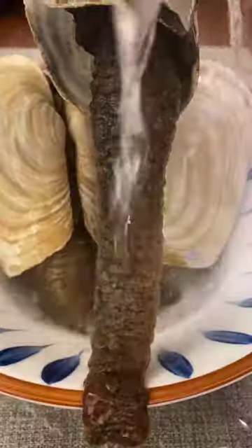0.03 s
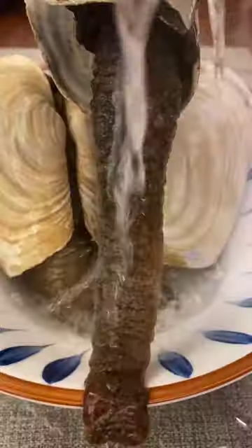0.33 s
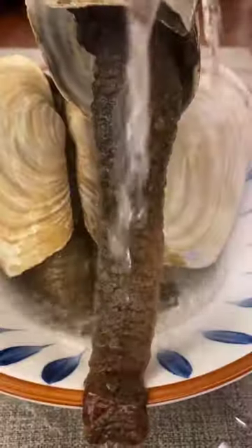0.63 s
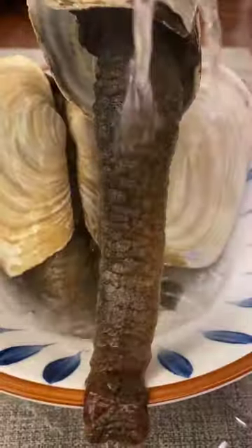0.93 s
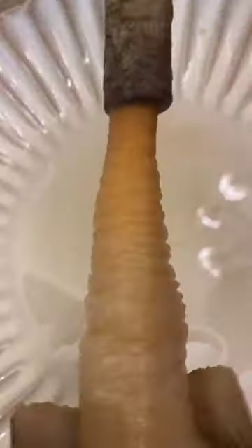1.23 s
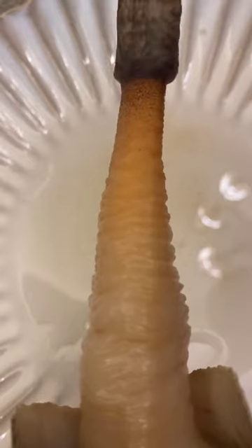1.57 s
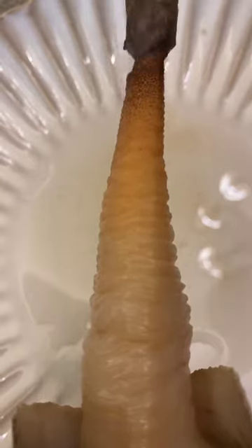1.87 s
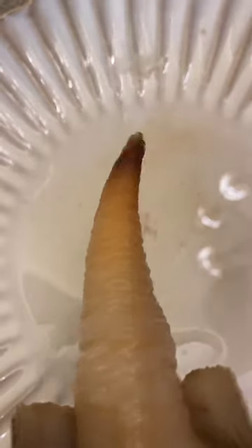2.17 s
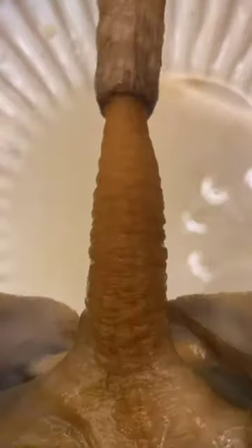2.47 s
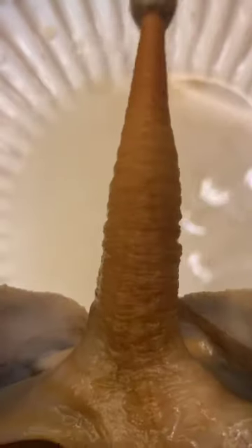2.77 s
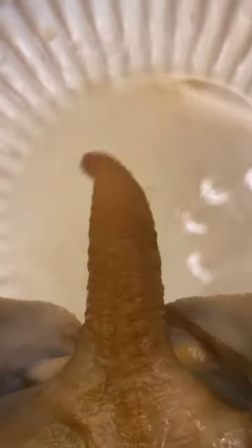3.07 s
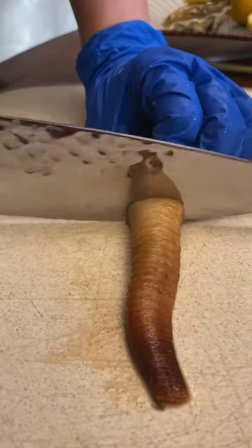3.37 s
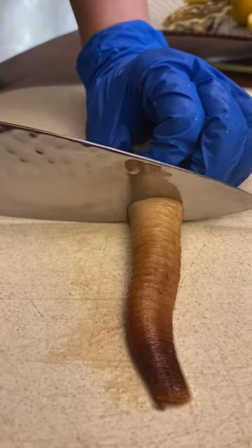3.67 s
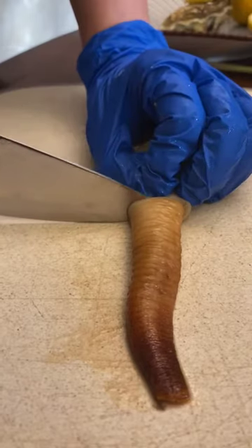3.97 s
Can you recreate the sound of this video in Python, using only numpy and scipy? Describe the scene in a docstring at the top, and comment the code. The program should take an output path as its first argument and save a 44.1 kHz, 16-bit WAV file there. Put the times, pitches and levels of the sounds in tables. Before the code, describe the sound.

Close up in a kitchen with a low appliance hum, water splashes and bubbles over shellfish. After a quieter stretch of faint wet peeling, a knife cuts the flesh, hits the board once and drags along it.

```python
"""Rinsing, skinning and cutting a clam

Close kitchen scenes, joined by short fades, over a low appliance hum. A stream of water splatters on
a long-necked clam and gurgles into its plate; the wet skin is pulled off the neck with faint squelches;
then a knife crunches through the flesh, knocks on the cutting board and is drawn along it."""
import sys
import numpy as np
from scipy import signal
from scipy.fft import rfft, irfft
from scipy.io import wavfile

SR = 44100
rng = np.random.default_rng(int(sys.argv[2]) if len(sys.argv) > 2 else 0)


def int16_out(signal):
    """Quantize to a 16-bit WAV file."""
    q = np.round(np.clip(np.atleast_2d(signal).T, -1, 1) * 32767)
    wavfile.write(sys.argv[1], SR, q.astype(np.int16))


N = 176400
TIME = np.arange(N) / SR
FREQS = np.maximum(np.fft.rfftfreq(N, 1 / SR), 1)

# room tone of each scene: start_s, hum_db, rumble_db, air_db, air_tilt_db_per_octave
ROOM_TONES = [(0, -53.5, -55.5, -53.5, 1), (0.098, -46, -46, -57.5, 5.5), (1.079, -46, -51.5, -55.5, 0.5),
              (2.385, -47, -51, -60, 0.73), (3.322, -52, -49, -56.5, 0)]
# EQ curves of room tone, running water and background hiss: frequency_hz, gain_db
RUMBLE_EQ = [(20, -30.5), (38, -16.5), (62, -0.5), (80, -0.5), (110, -5), (160, -9), (235, -10.5),
             (300, -17.5), (500, -29.5)]
AIR_EQ = [(100, -2.5), (250, 0), (600, -0.5), (1100, -7.5), (1600, -13), (2500, -20), (4000, -32),
          (8000, -42), (15000, -52.5)]
GURGLE_EQ = [(45, -3.5), (100, 25), (150, -6), (230, -1), (350, -6.5), (600, -3), (1000, -5), (1500, -12.5),
             (2400, -18), (3500, -31), (6000, -42)]
DRUM_EQ = [(38, -27), (65, 0), (110, 2.5), (190, -2), (260, -13.5), (500, -50)]
SPRAY_EQ = [(2000, 2), (3500, -9.5), (4700, -21.5), (5600, -2.5), (7000, -4.5), (9000, -2), (10500, -3),
            (12000, 2.5), (14000, -2.5), (16000, 3)]
HISS_EQ = [(700, 13), (2000, -3), (6000, -2.5)]
# stereo images, 1 is mono: frequency_hz, coherence
AIR_IMAGE = [(130, 1), (290, -0.23), (640, -0.63), (3100, -0.2), (15000, 0.47)]
WATER_IMAGE = [(290, 1), (640, 0.44), (1410, 1), (3100, 0.24), (15000, 0.26)]
KNIFE_IMAGE = [(290, 1), (1200, -0.079), (2500, 0.48), (6000, -0.19), (12000, 0.27)]
# envelopes of water in the plate, on the flesh and as spray: time_s, level_db
GURGLE_ENV = [(.1, -50.5), (.8, -49.5), (1.08, -50.5)]
DRUM_ENV = [(.1, -55), (.48, -64), (.54, -38), (.68, -44), (.86, -50), (1.08, -51)]
SPRAY_ENV = [(.1, -59), (.16, -65), (.177, -47), (.2, -55.5), (.3, -54.5), (.38, -65), (.42, -51),
             (.448, -62), (.477, -43), (.54, -64), (.58, -49.5), (.63, -72), (.75, -55), (.8, -51.5),
             (.9, -50), (.935, -72), (.97, -51.5), (1.06, -81)]
# drops slapping the shell: start_s, level_db, pitch_hz, brightness_db
SHELL_DROPS = [(0.1218, -35, 7000, 4.5), (0.1497, -27.5, 7700, -5.5), (0.1696, -52, 9300, 7),
               (0.2162, -39, 9100, 8), (0.2233, -35, 7040, -9), (0.2664, -37.5, 6800, 4.5),
               (.3270, -43, 7250, 9), (.3408, -35.5, 6700, -9), (0.4014, -53, 9200, 9),
               (0.4316, -31, 6750, -4.5), (0.4583, -37, 9200, -15), (0.4653, -33, 8310, -5),
               (.5013, -35, 6700, -12), (0.521, -35, 8600, -6), (0.5251, -31, 7700, -15),
               (0.5557, -39, 7850, 5), (0.5774, -34, 8300, 2), (0.6146, -31, 5240, -4.5),
               (.6480, -41, 6100, -7), (.6560, -34, 6900, -9.5), (.7082, -29, 7030, -11),
               (0.7644, -41.5, 6100, 9.5), (0.776, -41, 6550, 8), (0.7794, -43, 7500, 4),
               (0.7926, -36, 5670, 1), (0.7991, -28.5, 6700, -1), (0.8166, -29, 8400, 0),
               (0.86, -36, 6640, 3), (0.8782, -34.5, 6930, -13), (0.953, -31.5, 8000, -8),
               (.9793, -38.5, 9040, -14)]
# trapped bubbles plinking: start_s, level_db, pitch_hz, t60_s
BUBBLE_PLINKS = [(0.6148, -29, 3580, 0.018), (.7113, -45.5, 4250, 0.015), (0.7344, -42, 3900, 0.017),
                 (0.7387, -34.5, 5420, 0.015), (0.745, -29.5, 5550, 0.015), (0.9687, -42, 3540, 0.014)]
# wet skin squelching: peak_s, half_length_s, level_db, pitch_hz, width_hz
SKIN_SQUELCHES = [(2.255, 0.0045, -63, 5150, 450), (2.262, 0.019, -67, 3240, 450),
                  (2.269, 0.042, -74, 3880, 2000), (2.435, 0.021, -70.5, 2090, 2520),
                  (2.79, 0.078, -81.5, 4200, 1500), (2.877, 0.11, -71.5, 2300, 900),
                  (2.911, 0.005, -56.5, 2350, 1190), (2.943, 0.013, -56.5, 2460, 646),
                  (2.96, .003, -73, 6000, 900), (2.936, 0.049, -68.5, 3200, 1700),
                  (3.089, 0.013, -62, 1309, 400), (3.08, 0.041, -74.5, 2620, 1970)]
# resonances of knife and board: pitch_hz, half_width_hz, cut_db, draw_db
BOARD_MODES = [(247, 27, 0, -22), (291, 55, -2, -4), (456, 26, -5, -2), (592, 47, -7.5, 3.5),
               (784, 35, -7, 2), (1060, 65, -6.5, -3.5), (1250, 48, -9.5, 0), (2008, 148, -15.5, -5.5),
               (2194, 190, -22, -8), (2995, 96, -17, -11.5), (6130, 440, -27.5, -30),
               (6970, 730, -34.5, -28), (12300, 1900, -44.5, -29.5)]
# envelopes of the cut, the draw and the edge hissing on the board: time_s, level_db
CUT_ENV = [(3.33, -58), (3.38, -49), (3.47, -40), (3.505, -33), (3.53, -48.5), (3.57, -50.5), (3.61, -60),
           (3.68, -49.5)]
DRAW_ENV = [(3.5, -51), (3.62, -60.5), (3.68, -53.5), (3.81, -47), (3.95, -51), (4.0, -52)]
EDGE_ENV = [(3.63, -84), (3.66, -67.5), (3.748, -70), (3.76, -56.5), (3.83, -68), (3.95, -82)]
# blade and board thumping; fibres snapping, and the crack of the blade as it lands (near 3.502 s, 2470 Hz):
# start_s, level_db, pitch_hz, t60_s
BOARD_KNOCKS = [(3.503, -25, 315, 0.008), (3.5065, -14, 280, .02), (3.511, -31.5, 71.3, 0.25),
                (3.514, -34, 249.6, 0.3)]
SNAPS_AND_CRACKS = [(3.3892, -52, 6960, .006), (3.4741, -47, 7000, 0.0038), (3.502, -53.5, 12500, .02),
                    (3.5024, -39.5, 2470, 0.016), (3.512, -44, 6300, 0.011), (3.8536, -46.5, 6900, 0.0044)]
# panning of the chop: frequency_hz, left_over_right_db
CHOP_PAN = [(130, 0), (280, -2), (1200, -2.5), (3000, -0.5)]
# early reflections off nearby walls: delay_s, gain_db
WALL_ECHOES = [(.0057, -20.5), (.0093, -13)]

HUM_HZ, OVERTONE_DB, HUM_WAVER_DB = 101.06, -21, 1.4
CLUMPS_PER_S = 68  # how fast bubbles and friction come and go
DROP_RING_DB, DROP_ATTACK_S, DROP_T60_S = 5, 0.00017, 0.0029
SPLASH_DB, SPLASH_T60_S, SPLASH_HZ, SPLASH_SCATTER = 1.5, 0.0054, 12500, 0.089
REBOUND_S, REBOUND_DB = 0.0012, -3.5
PLATE_ECHO_S, PLATE_ECHO_DB = (.0007, 0.001208), -6  # left and right bounce off the plate
BURBLES_PER_S, BURBLE_DB, BURBLE_RANGE_HZ, BURBLE_CYCLES = 75, -52, (698, 5370), 48
BUBBLE_RISE = 0.92  # upward bend of plinks and burbles
CLICK_S, CLICK_DB, CLICK_T60_S = 1.387, -38.5, 0.0049
PULL_S, PULL_HALF_S, PULL_DB = 2.865, 0.13, -44
ROOM_T60_S, ROOM_LOW_CUT_HZ, WATER_ROOM_DB, SKIN_ROOM_DB, KNIFE_ROOM_DB = 0.17, 470, -8.5, 0, 1
FADE_S, FADE_POWER, FADE_FLOOR_DB = 0.051, 2.43, -47
HISS_DB, HIGH_CUT_HZ = -79, 15900


def from_db(db):
    """Decibels to gain."""
    return 10 ** (np.asarray(db) / 20)


def rms_one(x):
    """Scale to unit power."""
    return x / np.sqrt(np.mean(x ** 2) + 1e-20)


def envelope(rows):
    """Gain along a time_s, level_db curve, silent outside it."""
    s, db = np.transpose(rows)
    return from_db(np.interp(TIME, s, db)) * (TIME >= s[0]) * (TIME <= s[-1])


def flicker(depth_db):
    """A gain that wanders at random."""
    knots = np.arange(0, N / SR + 1, 1 / CLUMPS_PER_S)
    return from_db(depth_db * np.interp(TIME, knots, rng.standard_normal(N)[:len(knots)]))


def at_hz(points):
    """Read a curve at every frequency."""
    hz, value = np.transpose(points)
    return np.interp(np.log(FREQS), np.log(hz), value)


def colour(x, eq):
    """Apply an EQ curve, then scale to unit power."""
    return rms_one(irfft(rfft(x) * from_db(at_hz(eq)), N))


def low_cut(x, hz):
    """Roll off below a frequency."""
    return signal.sosfilt(signal.butter(2, hz, "high", fs=SR, output="sos"), x)


def low_noise(eq):
    """Bass noise with no treble."""
    return colour(rng.standard_normal(N), eq + [(4000, -120)])


def spread(pair, image):
    """Use two unrelated signals as mid and side of a stereo image."""
    coherence = np.clip(at_hz(image), -.999, .999)
    mid, side = rfft(pair) * np.sqrt([1 + coherence, 1 - coherence])
    return irfft(np.array([mid + side, mid - side]), N)


def grains(per_s, size_db):
    """Two unrelated trains of random clicks of uneven size."""
    sizes = from_db(size_db * np.minimum(rng.exponential(1, (2, N)), 4))
    return sizes * rng.choice([-1, 1], (2, N)) * (rng.random((2, N)) < per_s / SR) + 1e-18


def resonate(x, hz, width_hz):
    """A resonance with unity gain at its peak."""
    r = np.exp(-np.pi * width_hz / SR)
    feedback = [1, -2 * r * np.cos(2 * np.pi * hz / SR), r * r]
    return signal.lfilter(np.array([1, 0, -1]) * (1 - r * r) / 2, feedback, x)


def resonate_twice(x, hz, width_hz):
    """Two resonances in series, for steeper skirts."""
    return resonate(resonate(x, hz, width_hz), hz, width_hz)


def dying(t60):
    """Time and a decay that falls 60 dB in t60 seconds."""
    t = np.arange(SR // 3) / SR
    return t, np.exp(-np.log(1000) * t / t60)


def ping(hz, t60, rise=0):
    """A dying sine whose pitch may rise."""
    t, decay = dying(t60)
    return decay * np.sin(2 * np.pi * hz * t * (1 + rise * t))


def burst(hz, width_hz, t60):
    """A dying puff of noise around a pitch."""
    t, decay = dying(t60)
    return decay * rms_one(resonate(rng.standard_normal(len(t)), hz, width_hz))


def add(track, s, sound):
    """Mix a sound in at a time."""
    i = int(s * SR)
    track[i:i + len(sound)] += sound[:N - i]


def in_room(x, wet_db):
    """Dry sound plus a diffuse stereo tail with little bass."""
    t, decay = dying(ROOM_T60_S)
    tail = low_cut(rng.standard_normal((2, len(t))) * decay, ROOM_LOW_CUT_HZ)
    tail /= np.sqrt(np.sum(decay ** 2))
    return x + from_db(wet_db) * signal.fftconvolve(x[None], tail, axes=1)[:, :N]


def reflected(x):
    """Add early reflections off nearby walls, which return little bass."""
    bright = low_cut(x, ROOM_LOW_CUT_HZ)
    echoes = (from_db(db) * np.pad(bright, ((0, 0), (int(s * SR), 0)))[:, :N] for s, db in WALL_ECHOES)
    return x + sum(echoes)


def room_tone():
    """Wavering appliance hum, rumble and air, balanced anew for each scene."""
    phase = 2 * np.pi * HUM_HZ * TIME
    waver = colour(rng.standard_normal(N), [(1, 0), (8, 0), (30, -40), (200, -120)])
    hum = np.sqrt(2) * (np.sin(phase) + from_db(OVERTONE_DB) * np.sin(2 * phase))
    hum *= from_db(HUM_WAVER_DB * waver)
    rumble = low_noise(RUMBLE_EQ)
    air = spread(rng.standard_normal((2, N)), AIR_IMAGE)
    out = np.zeros((2, N))
    for start, hum_db, rumble_db, air_db, tilt_db in ROOM_TONES:
        tilted_air = colour(air, [(hz, db + tilt_db * np.log2(hz)) for hz, db in AIR_EQ])
        bed = from_db(hum_db) * hum + from_db(rumble_db) * rumble + from_db(air_db) * tilted_air
        out = np.where(TIME >= start, bed, out)
    return out


def bubbling(low_hz, high_hz, per_s, cycles, size_db, clump_db, bands):
    """A crowd of briefly ringing bubbles, the small high ones more frequent."""
    pitches = np.geomspace(low_hz, high_hz, bands)
    shares = np.sqrt(pitches) / np.sqrt(pitches).sum()
    out = np.zeros((2, N))
    for hz, share in zip(pitches, shares):
        pops = grains(per_s * share, size_db) * flicker(clump_db)
        out += share * rms_one(resonate(pops, hz, 2 * hz / cycles))
    return out


def stream():
    """Running water bubbles in the plate, drums on the flesh and throws a fizzing spray."""
    bubbles = bubbling(151.4, 4455, per_s=4500, cycles=22.4, size_db=1.5, clump_db=0, bands=24)
    fizz = bubbling(3000, 14800, per_s=3000, cycles=25, size_db=2, clump_db=1, bands=18)
    lean_left = from_db([[.5], [-.5]])
    gurgle = colour(spread(bubbles, WATER_IMAGE), GURGLE_EQ) * envelope(GURGLE_ENV) * lean_left
    spray = colour(spread(fizz, WATER_IMAGE), SPRAY_EQ) * envelope(SPRAY_ENV)
    drumming = low_noise(DRUM_EQ) * envelope(DRUM_ENV)
    return gurgle + spray + drumming


def burbles():
    """Single bubbles ring in the pool while the water runs; the low ones last longer."""
    out = np.zeros(N)
    start, end = GURGLE_ENV[0][0], GURGLE_ENV[-1][0]
    low, high = BURBLE_RANGE_HZ
    for when, pitch, strength in rng.random((int(BURBLES_PER_S * (end - start)), 3)):
        hz = low * (high / low) ** pitch
        bubble = ping(hz, BURBLE_CYCLES / hz, BUBBLE_RISE)
        add(out, start + when * (end - start), from_db(BURBLE_DB) * (.5 + strength) * bubble)
    return in_room(out, WATER_ROOM_DB)


def drops():
    """Drops slap the shell with a tight ring and a bright splash; a few trap a bubble that plinks."""
    out = np.zeros(N)
    t, _ = dying(DROP_T60_S)
    attack = 1 - np.exp(-t / DROP_ATTACK_S)
    variations = rng.uniform(-0.87, 1, (len(SHELL_DROPS), 2))
    for (s, db, hz, bright_db), (tint, lag) in zip(SHELL_DROPS, variations):
        splash_hz = SPLASH_HZ * (1 + SPLASH_SCATTER * tint)
        puff = burst(splash_hz, width_hz=4000, t60=SPLASH_T60_S)
        splash = from_db(bright_db + SPLASH_DB) * np.tanh(puff)
        ring = from_db(DROP_RING_DB) * ping(hz, DROP_T60_S)
        slap = from_db(db) * attack * (ring + splash)
        add(out, s, slap)
        # the drop breaks up and lands again
        add(out, s + REBOUND_S * (1 + .5 * lag), from_db(REBOUND_DB) * slap)
    for s, db, hz, t60 in BUBBLE_PLINKS:
        add(out, s, from_db(db) * attack * ping(hz, t60, BUBBLE_RISE))
    direct = low_cut(out, hz=2800)
    off_plate = np.array([np.roll(direct, int(s * SR)) for s in PLATE_ECHO_S])
    return in_room(direct, WATER_ROOM_DB) + from_db(PLATE_ECHO_DB) * off_plate


def click():
    """One faint, dry click: a sudden step that dies away."""
    out = np.zeros(N)
    _, decay = dying(CLICK_T60_S)
    add(out, CLICK_S, -from_db(CLICK_DB) * decay)
    return out


def skin():
    """Swells of tiny wet clicks as the skin peels, with a dull handling rumble as it stretches."""
    out = np.zeros(N)
    for s, half_s, db, hz, width in SKIN_SQUELCHES:
        crackle = rms_one(resonate_twice(grains(per_s=900, size_db=1)[0], hz, width))
        out += from_db(db) * crackle * np.exp(-((TIME - s) / half_s) ** 2)
    rumble = low_noise([(30, -4), (75, 14), (110, -1.5), (250, -41)])
    pull = from_db(PULL_DB) * rumble * np.exp(-((TIME - PULL_S) / PULL_HALF_S) ** 2)
    return in_room(out, SKIN_ROOM_DB) + pull


def knife():
    """Tearing fibres and then friction excite knife and board; between them the blade lands."""
    fibres = spread(grains(per_s=3000, size_db=3), KNIFE_IMAGE)
    friction = spread(grains(per_s=5900, size_db=2.5), KNIFE_IMAGE)
    crunch, scrape = np.zeros((2, 2, N))
    for hz, half_width, cut_db, draw_db in BOARD_MODES:
        crunch += from_db(cut_db) * resonate_twice(fibres, hz, 2 * half_width)
        scrape += from_db(draw_db) * resonate_twice(friction, hz, 2 * half_width)
    hits = np.zeros(N)
    for s, db, hz, t60 in BOARD_KNOCKS:
        add(hits, s, from_db(db) * ping(hz, t60))
    for s, db, hz, t60 in SNAPS_AND_CRACKS:
        add(hits, s, from_db(db) * burst(hz, width_hz=0.14 * hz, t60=t60))
    chop = rms_one(crunch) * envelope(CUT_ENV) + in_room(hits, KNIFE_ROOM_DB)
    pan = from_db(at_hz(CHOP_PAN) * [[.5], [-.5]])
    chop = irfft(rfft(chop) * pan, N)
    draw = rms_one(scrape) * flicker(depth_db=1) * envelope(DRAW_ENV)
    edge_hiss = colour(fibres, [(4700, -18), (6200, 15), (9500, 2.5), (13000, 6), (15500, -9)])
    return chop + draw + edge_hiss * envelope(EDGE_ENV)


def scene():
    """Water, skin and knife work over the kitchen's room tone."""
    return room_tone() + reflected(stream() + knife()) + drops() + skin() + click() + burbles()


def record(dry):
    """Fade out and in at each change of scene, lay in a faint steady hiss and cut the top."""
    to_change_s = np.min([np.abs(TIME - row[0]) for row in ROOM_TONES[1:]], axis=0)
    fade = np.minimum(from_db(FADE_FLOOR_DB) + (to_change_s / FADE_S) ** FADE_POWER, 1)
    hiss = from_db(HISS_DB) * colour(rng.standard_normal((2, N)), HISS_EQ)
    high_cut = signal.ellip(10, .05, 60, HIGH_CUT_HZ, fs=SR, output="sos")
    return signal.sosfiltfilt(high_cut, dry * fade + hiss)


dry = scene()
out = record(dry)
int16_out(out)
```